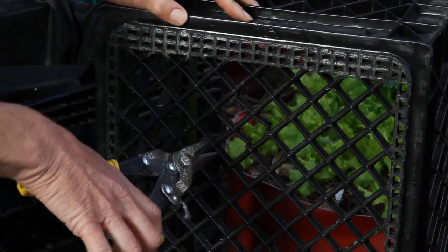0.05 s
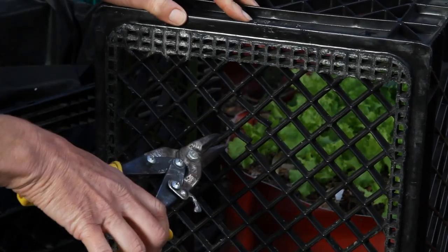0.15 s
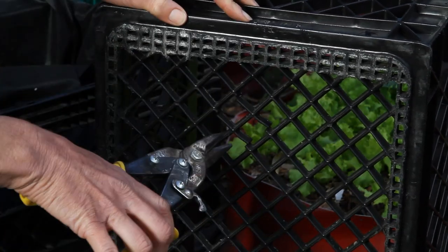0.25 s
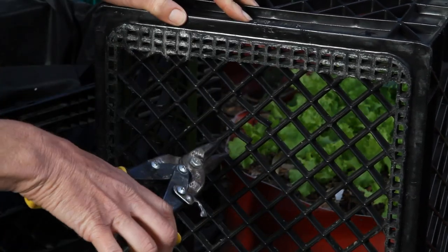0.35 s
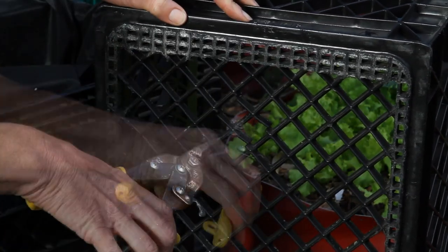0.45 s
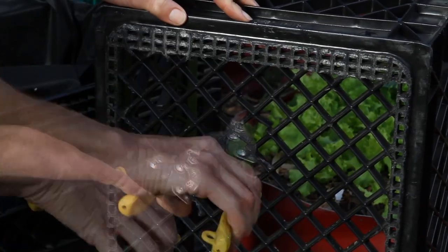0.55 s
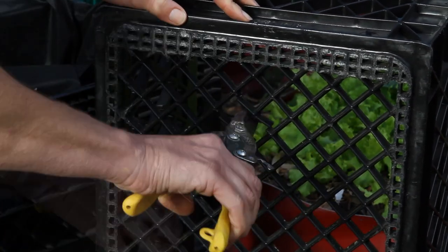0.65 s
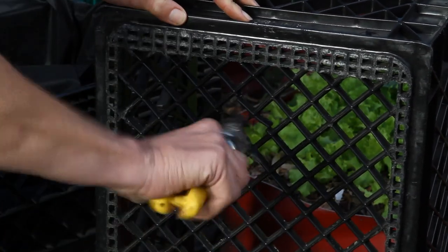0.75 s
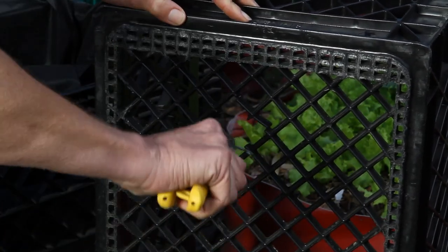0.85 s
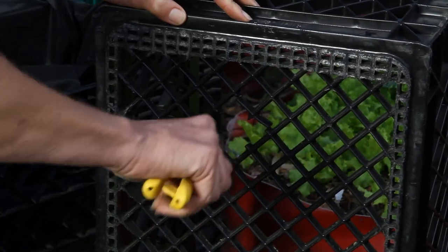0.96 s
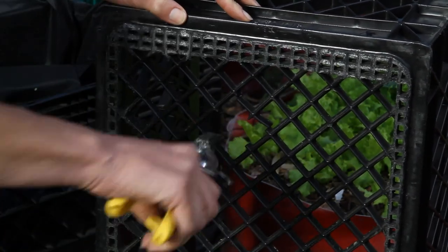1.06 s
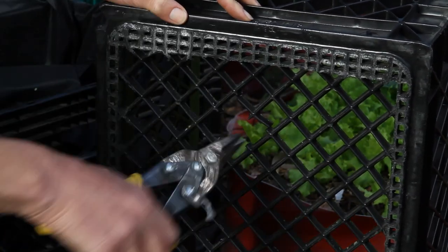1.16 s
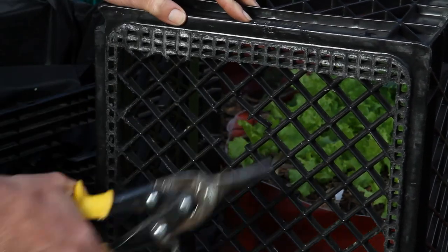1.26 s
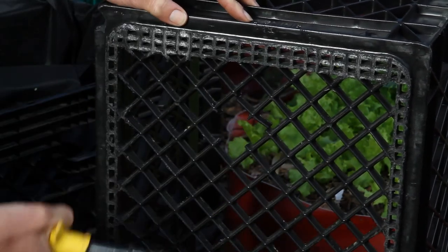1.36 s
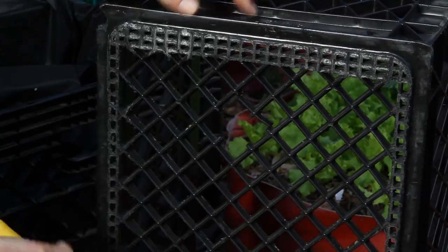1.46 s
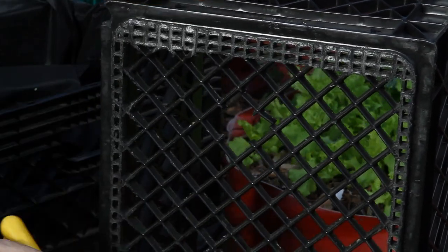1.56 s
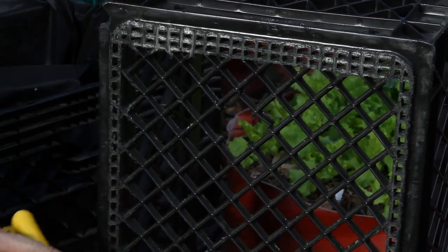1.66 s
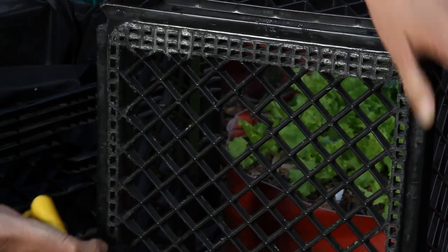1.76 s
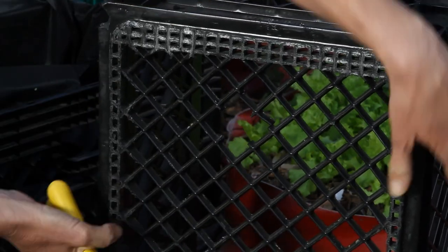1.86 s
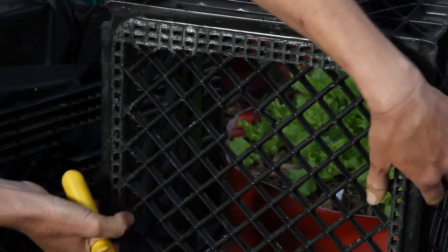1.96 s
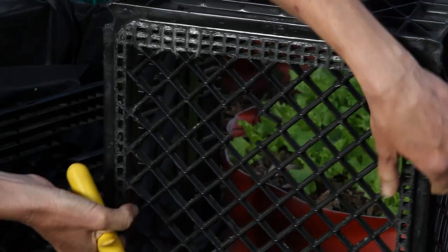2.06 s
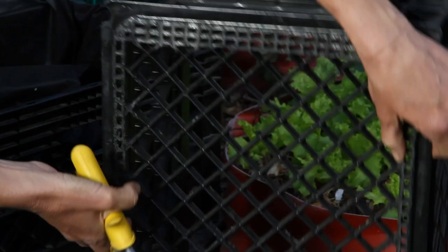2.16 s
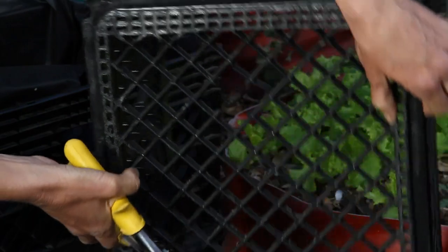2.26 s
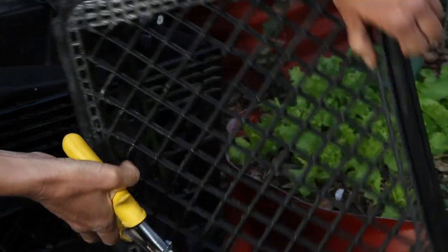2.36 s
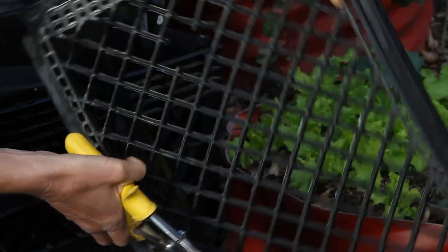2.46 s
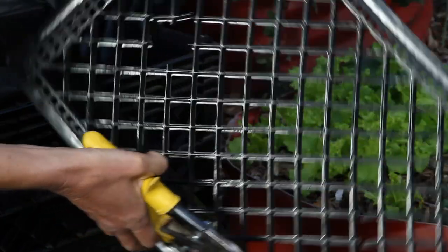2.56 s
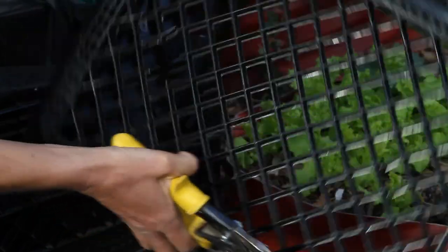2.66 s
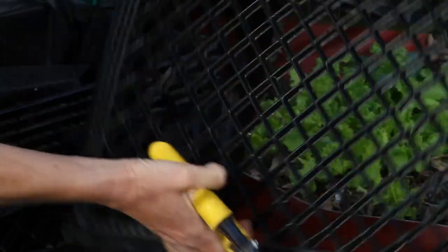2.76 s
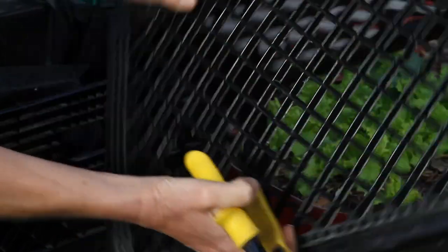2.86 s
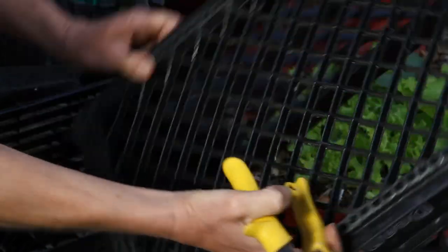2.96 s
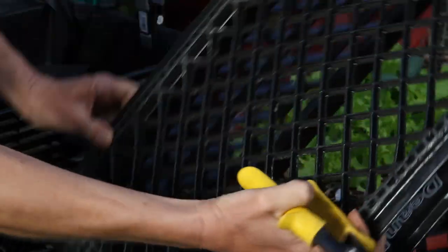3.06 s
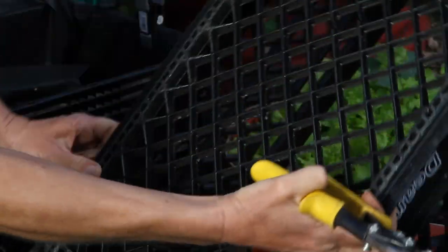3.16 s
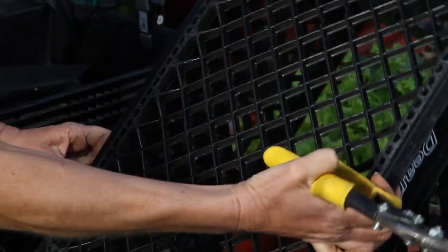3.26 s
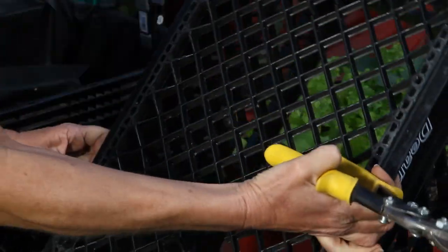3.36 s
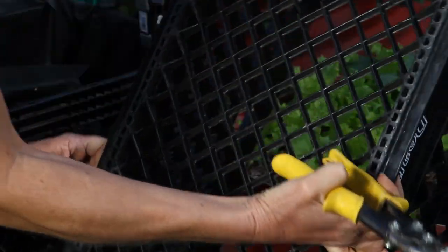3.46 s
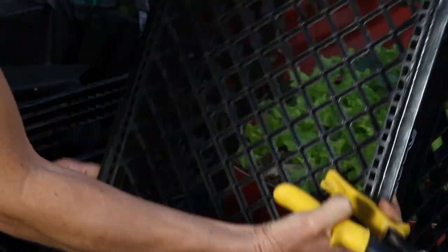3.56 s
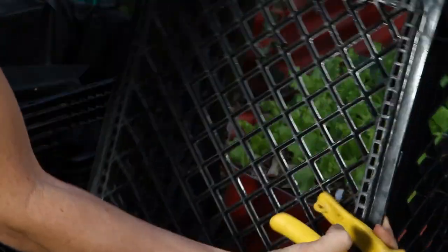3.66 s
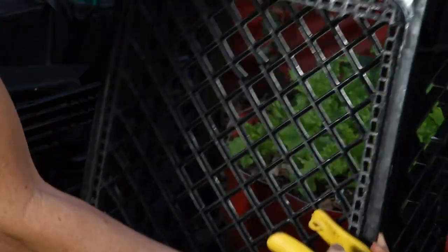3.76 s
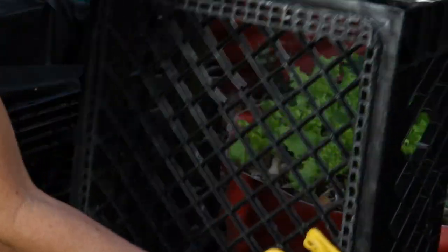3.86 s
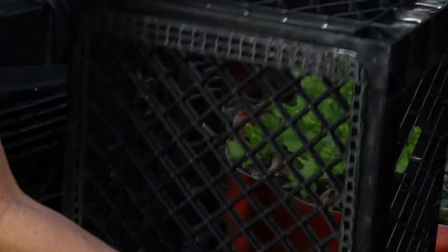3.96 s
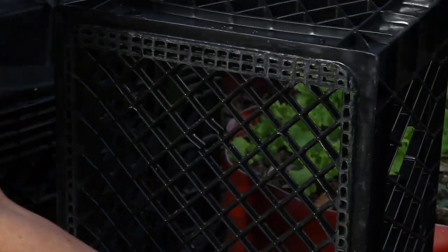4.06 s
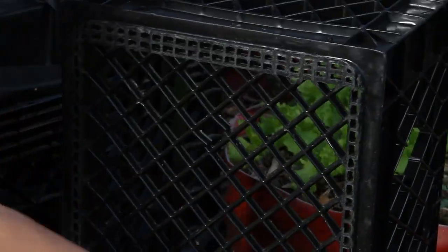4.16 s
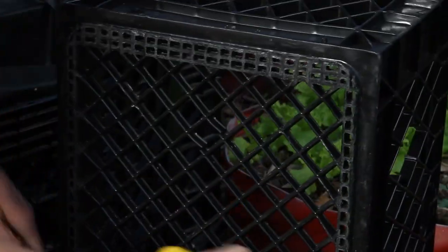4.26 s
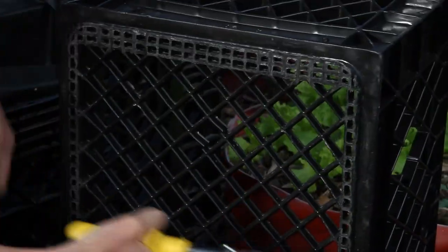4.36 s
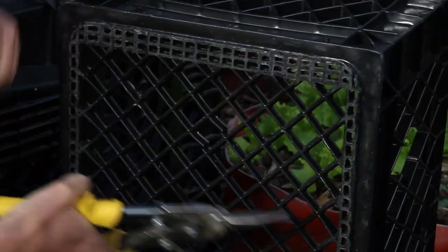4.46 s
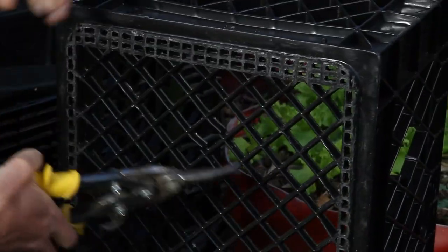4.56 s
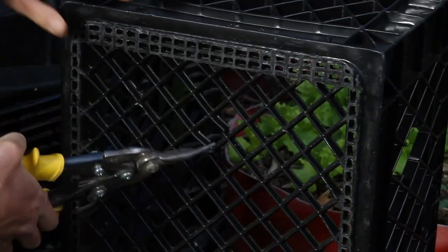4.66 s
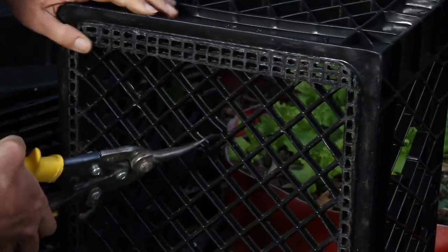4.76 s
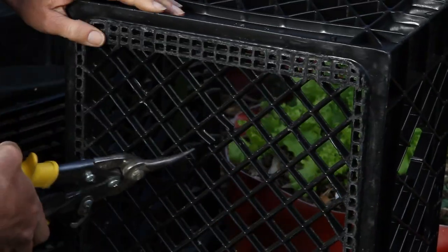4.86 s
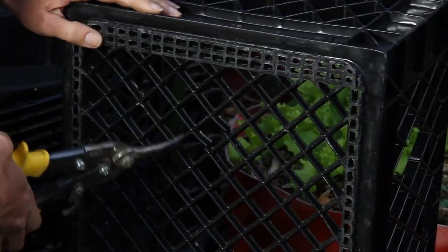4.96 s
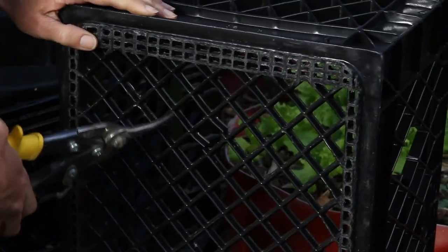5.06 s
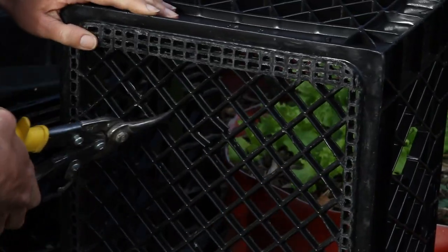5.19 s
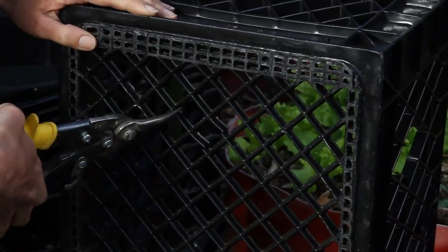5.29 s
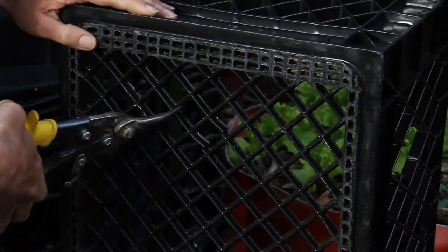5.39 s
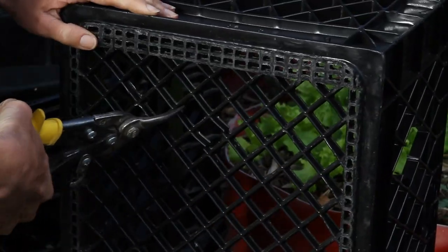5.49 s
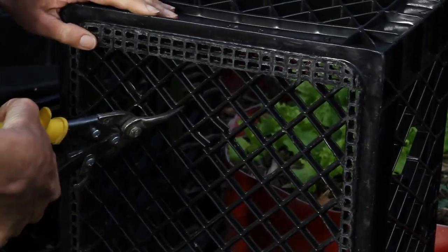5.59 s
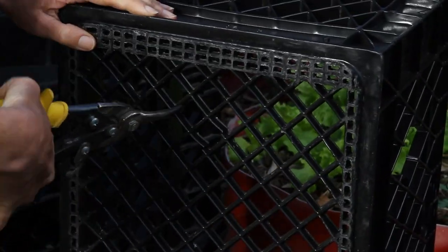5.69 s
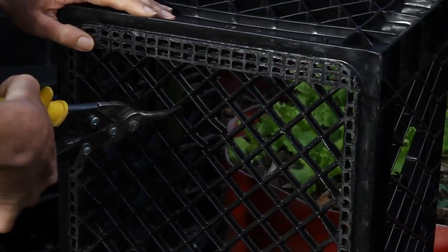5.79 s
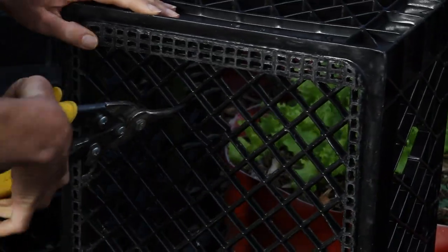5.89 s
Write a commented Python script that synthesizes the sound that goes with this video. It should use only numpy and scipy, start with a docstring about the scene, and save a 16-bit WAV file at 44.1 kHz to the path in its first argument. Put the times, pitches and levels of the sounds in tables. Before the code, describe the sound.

Close, nearly centred sound of hand snips on a hollow lattice crate. Faint rubbing leads to a sharp snap and metallic clicks, then scuffs, a short rib-ticking drag and small rattles. A cluster of booming plastic knocks overloads the microphone and briefly pushes down the low airy background; afterwards only light clicks, taps and faint scraping remain.

```python
"""Steady background air comes first, with a faint tick of steel snips close to the microphone.
The snips bite through a rib of a plastic crate and clack open: decaying modes of steel and crate.
A hand judders over the rim in low pushes; the crate is dragged round, ribs ticking over an edge, and
knocks down a few times, then the blades feel for the next rib: rubs are strings of tiny catches.
The loudest blows overload the microphone, whose gain control ducks the background too."""
import sys
import numpy as np
from scipy import signal
from scipy.fft import rfft, irfft, next_fast_len
from scipy.io import wavfile
from scipy.ndimage import uniform_filter1d, map_coordinates

SR = 44100
rng = np.random.default_rng(int(sys.argv[2]) if len(sys.argv) > 2 else 0)


def bounce(signal):
    """Save signal as a 16-bit WAV file at the path given by the first command-line argument."""
    frames = np.transpose(np.atleast_2d(signal))
    limited = np.clip(frames, -1, 1)
    pcm = np.round(limited * 32767).astype(np.int16)
    wavfile.write(sys.argv[1], SR, pcm)


N = 261513

LIFE = np.arange(SR // 4) / SR  # seconds since a blow
TIME = np.arange(N) / SR  # seconds into the scene
ATTACK = SR // 125  # samples in the first 8 ms of a blow, over which its level is set

# steady background, relative spectrum: freq_hz, density_db (per Hz)
AIR_SPECTRUM = [(20, -15.5), (60, -7), (125, -2), (190, -9.5), (320, -11.5), (500, -9.5), (1200, -11.5),
                (1600, -16.5), (2400, -25.5), (5000, -26.5), (8000, -31), (16000, -33.5)]
# stereo spread of the background: freq_hz, side_db (relative to mid)
AIR_WIDTH = [(100, -24), (400, -32), (1400, -43.5), (3000, -21), (8000, -9), (14000, -3)]
# low rumble under the air, relative spectrum: freq_hz, density_db (per Hz)
RUMBLE_SPECTRUM = [(10, -8.5), (40, -16.5), (110, -18.0), (220, -49), (1000, -86)]
# jaws biting shut and springing open against their stops: start_s, clack_db, tick_db
JAW_HITS = [(0.035, -64, -41.5), (0.9498, -13, -47), (0.9623, -13.5, -38), (1.041, -41, -38),
            (1.137, -34, -32), (1.153, -25, -37), (1.2794, -55, -35.5), (1.421, -53, -44),
            (1.597, -22, -27), (1.613, -28.5, -39), (3.446, -64, -41.5), (4.291, -34.5, -35),
            (4.857, -17.5, -27), (5.057, -32.5, -40.5)]
# thin steel parts of the snips (blade tip, spring, catch) pinging: start_s, pitch_hz, level_db
STEEL_PINGS = [(0.948, 4420, -16), (1.146, 5100, -27.5), (1.154, 2190, -20), (2.851, 10500, -27.5),
               (3.722, 8650, -34), (3.731, 10700, -37)]
# modes of the snips, relative levels: pitch_hz, level_db, t60_s
STEEL_MODES = [(1113, -3.5, 0.058), (1422, -1, 0.047), (1688, 3.5, 0.029), (2025, 3, 0.02),
               (2280, -11, 0.038), (3290, -13.5, 0.037), (3900, -9, .03), (4170, -10, 0.022)]
# steel on steel, relative spectrum: freq_hz, density_db (per Hz)
TICK_SPECTRUM = [(500, -2.5), (1700, 1), (2600, -9), (4200, 0), (7000, -3), (11000, -6), (16000, -19)]
# smooth rubs of blades, hands and rim on the plastic:
# full_pressure_s, rise_s, hold_s, release_s, body_db, hiss_db
SMOOTH_RUBS = [(.48, 0.2, 0.32, 0.12, -44.5, -50), (.953, 0.022, 0.023, 0.033, -21, -48),
               (2.06, 0.033, .02, .05, -15.5, -17), (2.1, 0.037, 0.081, .03, -22, -30.5),
               (2.85, 0.6, 0.21, 0.33, -43.5, -46), (3.72, .03, .07, .08, -35.5, -45.5),
               (4.013, 0.13, .008, 0.033, -10, -17.5), (4.068, 0.034, .01, .03, -22, -44),
               (4.27, .08, 0.019, 0.037, -45, -47.5), (4.765, 0.025, 0.012, .05, -56, -40),
               (5.87, 0.43, .02, .15, -38.5, -48)]
# ribbed wall dragged over an edge as the crate swings round:
# full_pressure_s, rise_s, hold_s, release_s, body_db, grit_db
RIB_DRAGS = [(2.42, 0.26, .15, 0.094, -19.5, -30.5)]
# plastic sliding smoothly, relative spectrum: freq_hz, density_db (per Hz)
HISS_SPECTRUM = [(1200, -11), (2000, 4), (2700, -5), (4100, 1.5), (5500, -3), (6800, -9.5), (8500, -9),
                 (11000, -18.5), (16000, -23)]
# plastic rubbing on grit, relative spectrum: freq_hz, density_db (per Hz)
GRIT_SPECTRUM = [(1500, -48), (2500, -5), (4200, 4.5), (5500, 4.5), (7500, 0), (11000, -6.5), (16000, -11)]
# wall modes of the crate, relative levels: pitch_hz, level_db, t60_s
CRATE_MODES = [(327.6, -14.5, 0.31), (453.6, -14, 0.16), (537, -9, 0.04), (674.4, -13.5, 0.16),
               (758, -15, 0.16), (873, -0.5, 0.064), (1042, -2, 0.051), (1201, 1, 0.046), (1348, 6, 0.039),
               (1470, -6, 0.045), (1614, -22, 0.048), (1800, -21, 0.032)]
# the crate's many closely spaced lattice modes, relative spectrum: freq_hz, density_db (per Hz)
LATTICE_SPECTRUM = [(60, -19), (150, 2.5), (220, -18.5), (310, -6.5), (390, -8.5), (470, -3.5), (600, -8),
                    (850, -1.5), (1300, 2), (1900, -6), (2500, -17.5), (4000, -14), (5500, -11.5),
                    (7000, -16.5), (8000, -12.5), (11000, -16.5), (16000, -18)]
# how long the lattice rings: freq_hz, t60_s
LATTICE_DECAY = [(120, 0.41), (400, 0.25), (1100, 0.11), (2700, 0.059), (7000, 0.028), (15000, 0.07)]
# cuts and knocks on the crate: start_s, thud_db, body_db (hollow), crack_db
CRATE_KNOCKS = [(0.637, -24.5, -22.5, -43), (0.694, -49, -33, -50), (0.7996, -17.5, 0, -2.5),
                (0.809, -27, -3.5, -12), (0.834, -23, -13.5, -22), (0.9489, -34, -17.5, -19),
                (0.993, -27, -25.5, -37.5), (1.0713, -24, -14.5, -25.5), (1.9707, -31, -20, -34),
                (2.066, -34, -14.5, -23), (2.183, -31, -21, -31.5), (2.457, -32, -13.5, -25.5),
                (2.475, -26, -11.5, -53), (2.606, -19.5, -15.5, -33), (2.69, -34.5, -30.5, -42),
                (2.838, -32.5, -33, -36), (2.997, -31.5, -17, -31), (3.2, -26.5, -26.5, -38.5),
                (3.288, -41.5, -36.5, -36), (3.684, -10.5, 1.5, -18), (3.794, -12, 4.5, -17),
                (3.8661, -13.5, 1.5, -27.5), (3.924, -15.5, -11.5, -35), (3.972, -16.5, -20, -42),
                (4.0132, -40, -4.5, -14.5), (4.039, -16, -24, -37), (4.0645, -16, -6, -20),
                (4.14, -39, -27.5, -45), (4.167, -43, -31, -43), (4.509, -47, -31, -62),
                (5.166, -31.5, -18, -34), (5.317, -32.5, -30, -40.5), (5.418, -28.5, -17.5, -29),
                (5.7, -33, -28.5, -37)]
# the crate's weight landing: start_s, level_db
CRATE_LANDINGS = [(2.185, -34), (2.375, -30), (3.198, -24.5), (3.26, -35), (3.682, -26), (3.925, -28),
                  (4.033, -18)]
# the whole crate flexing on its base, relative levels: pitch_hz, level_db, t60_s
FLEX_MODES = [(85, -4, .13), (132, 0, .11), (175, -6, .07)]

AIR_DB, RUMBLE_DB = -40, -52
PUFF_S, PUFF_RISE_S, PUFF_FALL_S, PUFF_DB = 5.42, 0.089, .65, -35  # one low swell of rumble
JAW_BOUNCE_S, JAW_CLACK_LOSS_DB, JAW_TICK_LOSS_DB = .005, 4.5, 9  # the jaws bounce once off the stop
STROKE_RANGE_DB = 30.5  # pressure gained over a rise
HISS_GROWS = 1.39  # dB of hiss per dB of pressure
# a blow touches twice: the second touch is duller, and heavier blows return less of it
REBOUND_S, REBOUND_LOSS_DB, REBOUND_DULL_DB = .0055, 2, 14
LIGHT_DB, HEAVY_LOSS = -20.5, 0.78  # body level of a light tap; further dB lost per dB above it
RUN_JITTER_S, RUN_SCATTER_DB = .001, 2.5  # no two knocks in a run are quite alike
# a hand sticks and slips on the rim, ever more slowly (each gap longer by the ratio)
JUDDER_START_S, JUDDER_GAP_S, JUDDER_SLOWING, JUDDER_DB = 1.782, .014, 1.15, -22
TOP_HZ = 15900  # nothing above this is recorded


def amp(db):
    """Decibels to gain."""
    return 10 ** (np.asarray(db) / 20)


def unit(x, size=None):
    """Scale to rms 1 over the first size samples."""
    return x / np.sqrt(np.mean(x[..., :size] ** 2, axis=-1, keepdims=True) + 1e-20)


def decay(t60_s):
    """An exponential decay that falls 60 dB in t60_s."""
    return amp(-60 * LIFE / t60_s)


def along(points, hz):
    """Interpolate (Hz, value) points on a log frequency axis."""
    f, v = np.transpose(points)
    return np.interp(np.log(hz + 1), np.log(f + 1), v)


def wobble(rate):
    """A smooth random curve, rate knots a second."""
    knots = rng.standard_normal(int(N * rate / SR) + 4)
    return map_coordinates(knots, [TIME * rate])


def filtered(x, response):
    """Multiply the spectrum of x by a response of frequency."""
    n = x.shape[-1]
    m = next_fast_len(n + 8192)
    return irfft(rfft(x, m) * response(np.fft.rfftfreq(m, 1 / SR)), m)[..., :n]


def noise(spectrum, shape):
    """Coloured noise of rms 1."""
    return unit(filtered(rng.standard_normal(shape), lambda hz: amp(along(spectrum, hz))))


def band(x, lo_hz, hi_hz):
    """A causal band-pass."""
    edges = [lo_hz, min(hi_hz, SR / 2 - 1)]
    return signal.sosfilt(signal.butter(3, edges, "band", fs=SR, output="sos"), x)


def add(track, s, sound):
    """Mix a sound into a track at time s."""
    part = track[max(round(s * SR), 0):][:len(sound)]
    part += sound[:len(part)]


def pressure_db(s, rise_s, hold_s, fall_s):
    """A stroke builds up, holds at 0 dB and lets go."""
    outside = np.maximum((s - TIME) / rise_s, (TIME - s - hold_s) / fall_s)
    return -STROKE_RANGE_DB * np.clip(outside, 0, 10)


def ringing(modes, count, scatter_db, detune):
    """One decaying ring per blow; each point of contact weights the modes anew."""
    rings = np.zeros((count, len(LIFE)))
    for hz, db, t60_s in modes:
        size, pitch, side = rng.standard_normal((3, count, 1))
        gain = np.sign(side) * amp(db + scatter_db * size)
        tone = np.sin(2 * np.pi * hz * (1 + detune * pitch) * LIFE)
        rings += gain * decay(t60_s) * tone
    return unit(rings, size=ATTACK)


def crate_rings(count, lattice_db):
    """The crate answers count blows with wall modes plus a dense lattice, each band decaying at its own rate."""
    hz, t, z = signal.stft(noise(LATTICE_SPECTRUM, (count, len(LIFE))), SR, nperseg=128)
    fading = z * amp(-60 * t / along(LATTICE_DECAY, hz)[:, None])
    lattice = signal.istft(fading, SR, nperseg=128)[1][:, :len(LIFE)]
    walls = ringing(CRATE_MODES, count, scatter_db=4.5, detune=0.011)
    return walls + amp(lattice_db) * unit(lattice, size=ATTACK)


def background():
    """Steady air, a little wider in the treble, with a low rumble under it that swells once."""
    mid, side = noise(AIR_SPECTRUM, (2, N))
    side = filtered(side, lambda hz: amp(along(AIR_WIDTH, hz)))
    air = amp(AIR_DB + 0.19 * wobble(2.86)) * np.array([mid + side, mid - side])
    swell = amp(RUMBLE_DB) + amp(PUFF_DB + pressure_db(PUFF_S, PUFF_RISE_S, 0, PUFF_FALL_S))
    return air + swell * amp(0.67 * wobble(11)) * noise(RUMBLE_SPECTRUM, N)


def snips(tick_t60_s=0.031, ping_t60_s=0.033):
    """The jaws clack shortly and bounce once, damped by the hand; thin steel parts ping."""
    track = np.zeros(N)
    bounces = [(s + JAW_BOUNCE_S, clack_db - JAW_CLACK_LOSS_DB, tick_db - JAW_TICK_LOSS_DB)
               for s, clack_db, tick_db in JAW_HITS]
    hits = list(JAW_HITS) + bounces
    clacks = ringing(STEEL_MODES, len(hits), scatter_db=2, detune=.015)
    ticks = unit(noise(TICK_SPECTRUM, clacks.shape) * decay(tick_t60_s), size=ATTACK)
    for (s, clack_db, tick_db), clack, tick in zip(hits, clacks, ticks):
        add(track, s, amp(clack_db) * clack + amp(tick_db) * tick)
    for s, hz, db in STEEL_PINGS:
        add(track, s, amp(db) * decay(ping_t60_s) * np.sin(2 * np.pi * hz * LIFE))
    return track


def scrape(strokes, spectrum, catch_rate, size_db, rub, grit_t60_s, low_hz, count=8):
    """Plastic catches and lets go unevenly, on count spots that each ring and rasp in their own way."""
    body_gain, grit_gain = np.zeros((2, N))
    for s, rise_s, hold_s, fall_s, body_db, grit_db in strokes:
        press_db = pressure_db(s, rise_s, hold_s, fall_s)
        body_gain += amp(body_db + press_db)
        grit_gain += amp(grit_db + HISS_GROWS * press_db)
    # catch_rate is the mean number of catches per second
    times = np.cumsum(rng.uniform(.3, 1.7, 5000)) / catch_rate
    sizes = amp(size_db * np.clip(rng.standard_normal(len(times)), -2, 2))
    spots = rng.integers(count, size=len(times))
    inside = times < TIME[-1]
    catches = np.zeros((count, N))
    catches[spots[inside], (times[inside] * SR).astype(int)] = sizes[inside]

    def play(answers):
        """Every catch sets off the answer of its own spot."""
        return unit(signal.oaconvolve(catches, answers, axes=1).sum(0)[:N])

    body = play(band(crate_rings(count, lattice_db=0), low_hz, 2420))
    rasp = play(noise(spectrum, (count, len(LIFE))) * decay(grit_t60_s))
    return body_gain * body + grit_gain * unit(rasp + rub * noise(spectrum, N))


def drag():
    """Smooth faces slide with fine, quick catches; the ribs chatter coarsely."""
    slide = scrape(SMOOTH_RUBS, HISS_SPECTRUM, catch_rate=420, size_db=3.5, rub=.25,
                   grit_t60_s=.025, low_hz=560)
    chatter = scrape(RIB_DRAGS, GRIT_SPECTRUM, catch_rate=135, size_db=4, rub=.18,
                     grit_t60_s=.02, low_hz=330)
    return slide + chatter


def knock_run(first_s, last_s, thud_db, body_db, crack_db, harden_db, count):
    """A run of near-evenly spaced light knocks; positive harden_db moves level from thud to crack."""
    late, size = rng.standard_normal((count, 2)).T
    harder = harden_db * np.linspace(-1, 1, count)
    size_db = RUN_SCATTER_DB * size
    times = np.linspace(first_s, last_s, count) + RUN_JITTER_S * late
    return np.transpose([times, thud_db + size_db - harder, body_db + size_db,
                         crack_db + size_db + harder])


def contacts():
    """Knocks, their rebounds, a fast run of ribs and a slow run of light rattling knocks, in one list."""
    # columns: start_s, thud_db, body_db, crack_db
    s, thud_db, body_db, crack_db = np.transpose(CRATE_KNOCKS)
    loss_db = REBOUND_LOSS_DB + HEAVY_LOSS * np.maximum(body_db - LIGHT_DB, 0)
    rebounds = np.transpose([s + REBOUND_S, thud_db - loss_db, body_db - loss_db,
                             crack_db - loss_db - REBOUND_DULL_DB])
    # ribs tick over an edge; as the weight comes off, thud gives way to crack
    ribs = knock_run(first_s=2.378, last_s=2.589, thud_db=-33.5, body_db=-22.5, crack_db=-28.5,
                     harden_db=4, count=12)
    rattle = knock_run(first_s=2.791, last_s=2.951, thud_db=-35, body_db=-26.5, crack_db=-45,
                       harden_db=-0.3, count=5)
    return np.vstack([CRATE_KNOCKS, rebounds, ribs, rattle])


def knocks(shock=0.22, shock_t60_s=0.055, spread_s=0.0006, hardness=0.23, sharpness=0.068,
           neutral_db=-8, loss=170, crack_rise_s=0.00039, thud_t60_s=1.0):
    """Cuts and knocks: soft contacts mostly thud, a breaking rib cracks."""
    track = np.zeros(N)
    blows = contacts()
    thud_db, body_db, crack_db = blows.T[1:, :, None]
    # the struck spot sounds first, before the blow spreads through the walls
    rings = crate_rings(len(blows), lattice_db=-0.5) * (1 + shock * decay(shock_t60_s))
    # heavy blows press the crate against its base, which damps it (loss in dB/s at 0 dB body)
    rings = rings * amp(-loss * amp(body_db) * LIFE)
    # a harder contact favours the higher modes (hardness, sharpness in dB per octave per dB)
    hard_db = crack_db - thud_db - neutral_db
    walls = filtered(rings, lambda hz: amp(
        hardness * hard_db * np.log2(np.clip(hz, 400, 2400) / 1000)))
    ribs = filtered(rings, lambda hz: amp(
        (sharpness * hard_db - 10.0) * np.log2(np.maximum(hz / 4000, 1))))
    thuds = unit(band(rings, 227, 543) * decay(thud_t60_s), size=SR // 50)
    bodies = unit(band(walls, 590, 1980) * (1 - np.exp(-LIFE / spread_s)), size=ATTACK)
    cracks = unit(band(ribs, 2900, 19400) * (1 - np.exp(-LIFE / crack_rise_s)), size=ATTACK)
    sounds = amp(thud_db) * thuds + amp(body_db) * bodies + amp(crack_db) * cracks
    for s, sound in zip(blows[:, 0], sounds):
        add(track, s, sound)
    return track


def judder(push_s=0.00021, scatter_db=2.5, count=8):
    """Each slip of the hand is one soft, low push; every gap is longer than the last."""
    track = np.zeros(N)
    push = band(-LIFE * np.exp(-LIFE / push_s), 44, 425)
    push = push / np.abs(push).max()
    gaps = JUDDER_GAP_S * JUDDER_SLOWING ** np.arange(count)
    times = JUDDER_START_S + np.cumsum(gaps) - gaps
    for s, size in zip(times, rng.standard_normal(count)):
        add(track, s, amp(JUDDER_DB + scatter_db * size) * push)
    return track


def landings():
    """Set down, the whole crate flexes on its base and gives a low bump."""
    track = np.zeros(N)
    bumps = ringing(FLEX_MODES, len(CRATE_LANDINGS), scatter_db=-0.5, detune=0.083)
    for (s, db), bump in zip(CRATE_LANDINGS, bumps):
        add(track, s, amp(db) * bump)
    return track


def surroundings(x, t60_s=0.2):
    """Nearby stacks and walls return a dull tail: decaying noise of unit energy, softly started."""
    tail = band(rng.standard_normal(len(LIFE)), 100, 3500) * decay(t60_s)
    tail = tail * (1 - np.exp(-LIFE / 0.0027))
    return signal.fftconvolve(x, tail / np.linalg.norm(tail))[:N]


def scene():
    """All the handling is close and straight ahead, so both microphone ports hear it alike."""
    near = snips() + drag() + knocks() + judder() + landings()
    return near + amp(-26.0) * surroundings(near) + background()


def record(dry, threshold_db=-5.0, depth_db=11, recovery_db=17.0, sense_s=0.0028):
    """Gain control ducks within milliseconds and recovers slowly; peaks still over full scale clip."""
    size = max(int(sense_s * SR), 2)
    past = (size - 1) // 2  # shifts the averaging window back in time
    power = uniform_filter1d(dry.mean(0) ** 2, size, origin=past)
    level = np.sqrt(np.abs(power) + 1e-12)
    excess_db = np.clip(20 * np.log10(level) - threshold_db, 0, depth_db)
    # recovery_db is regained each second
    regained_db = recovery_db * TIME
    duck_db = np.maximum.accumulate(excess_db + regained_db) - regained_db
    duck_db = uniform_filter1d(duck_db, size, origin=past)
    clipped = np.clip(dry * amp(-duck_db), -1, 1)
    return filtered(clipped, lambda hz: hz < TOP_HZ)


dry = scene()
out = record(dry)
bounce(out)
```